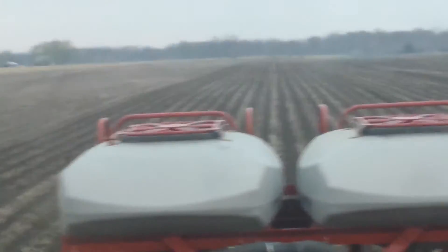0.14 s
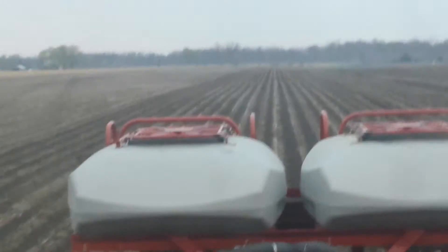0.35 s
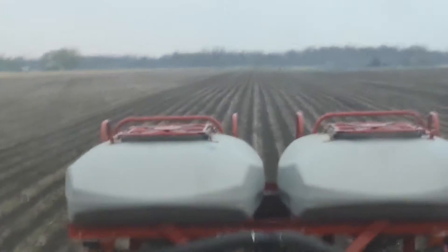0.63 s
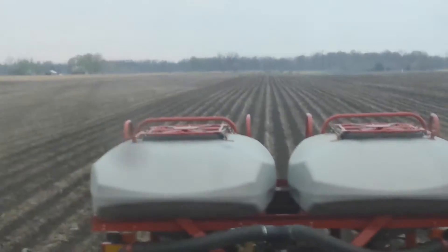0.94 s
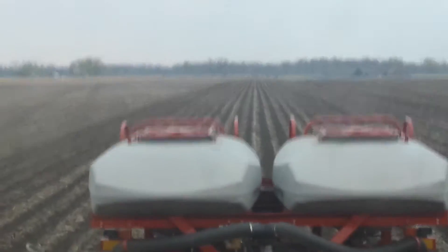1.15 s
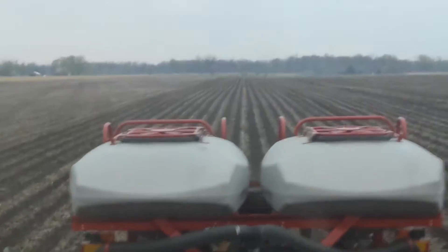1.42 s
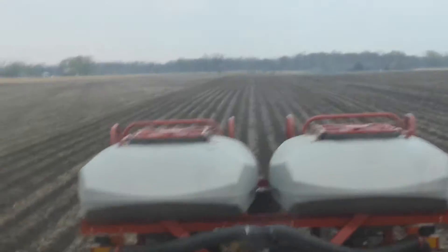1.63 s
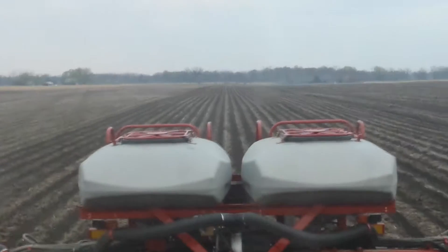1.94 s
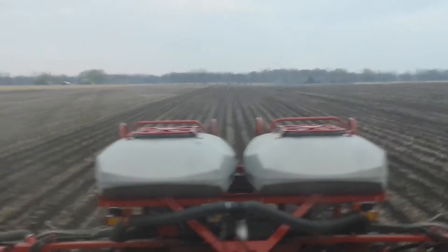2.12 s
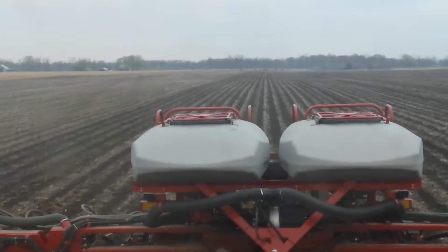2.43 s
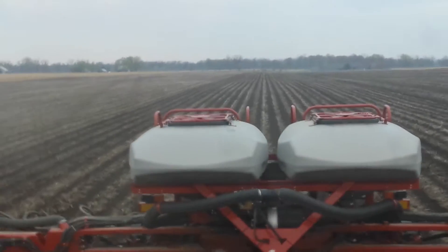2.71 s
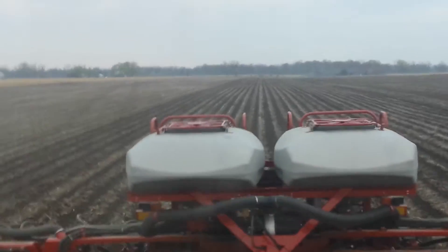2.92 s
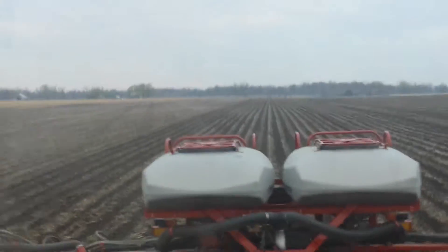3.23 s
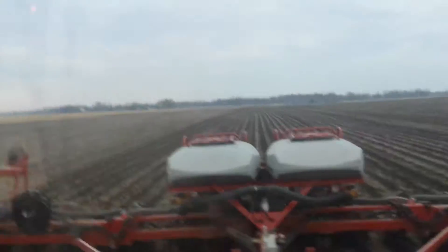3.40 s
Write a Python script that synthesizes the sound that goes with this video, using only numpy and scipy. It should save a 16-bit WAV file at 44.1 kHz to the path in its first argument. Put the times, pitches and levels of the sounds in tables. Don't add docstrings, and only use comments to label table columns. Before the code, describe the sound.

A tractor's hydraulic pump holds a steady, slightly wavering hum over a low diesel drone, with boomy cab resonance, blower rush, air hiss and faint rattles; close stereo microphone inside the closed cab.

```python
import sys
import numpy as np
from scipy import signal
from scipy.fft import rfft, irfft
from scipy.io import wavfile

SR = 44100
rng = np.random.default_rng(int(sys.argv[2]) if len(sys.argv) > 2 else 0)


def invert_db(level):
    return 10 ** (np.asarray(level, dtype=float) / 20)


def wrap_up_sound(samples):
    columns = np.atleast_2d(samples).T
    tamed = np.clip(columns, -1, 1)
    steps = np.round(tamed * 32767).astype(np.int16)
    wavfile.write(sys.argv[1], SR, steps)


N = 156996
PISTONS, GEAR_RATIO = 9, 1.1224


def rms_one(x):
    return x / np.sqrt(np.mean(x ** 2) + 1e-20)


def at_hz(points, hz):
    table_hz, values = np.transpose(points)
    return np.interp(np.log(hz), np.log(table_hz), values)


def noise_pair():
    return rng.standard_normal((2, N))


def drift(rate_hz):
    pole = np.exp(-80 * np.pi * rate_hz / SR)
    draws = rng.standard_normal(N // 40 + 2002)
    slow = signal.lfilter([1], [1, -2 * pole, pole * pole], draws)[2000:]
    return np.interp(np.arange(N) / 40, np.arange(len(slow)), rms_one(slow))


def resonance_db(hz, centre_hz, width_hz, lift_db):
    return lift_db / (1 + (2 * (hz - centre_hz) / width_hz) ** 2)


def shaft_tones(places, strengths, turns, swing_db):
    jitter_rad, overtones_follow = .012, .2
    out = np.zeros((2, N))
    ears = np.array([[.5], [-.5]])
    shaft_hz = np.gradient(turns) * SR
    for k, ((multiple, pan_db, lead_rad), (tone_db, waver_db)) in enumerate(zip(places, strengths)):
        phase = 2 * np.pi * (multiple * turns + rng.random())
        phase = phase + jitter_rad * multiple * drift(4.7)
        follow = overtones_follow if k else 1
        singing_db = resonance_db(multiple * shaft_hz, 1398, 7, 14)
        tone_db = tone_db + swing_db * follow + singing_db + waver_db * drift(3.7)
        out += np.sqrt(2) * invert_db(tone_db + ears * pan_db) * np.sin(phase + ears * lead_rad)
    return out


def pump_shaft():
    # t/s, rate f/Hz
    stroke_rate = [(0, 278.3), (.3, 277.7), (.75, 278), (1.1, 278.35), (1.45, 278.3), (1.7, 277.8),
                   (2.3, 277.75), (2.47, 279.5), (2.65, 278.1), (3.15, 278.1), (3.3, 279.5), (3.45, 278.4),
                   (3.56, 278.3)]
    strokes_hz = np.interp(np.arange(N) / SR, *np.transpose(stroke_rate))
    return np.cumsum(strokes_hz) / SR / PISTONS


def hydraulic_pump(pump_turns):
    # t/s, pressure pulse level/dB
    load = [(0.0, -15.5), (1.22, -15.5), (1.29, -20), (1.53, -12.5), (1.62, -15), (1.8, -13), (2.09, -16.5),
            (2.18, -10.5), (2.4, -16), (3.01, -15), (3.13, -16.5), (3.38, -13.5), (3.53, -23.5),
            (3.56, -24)]
    # multiple of shaft speed, left-right/dB, left leads/rad
    arrivals = [(9, .4, .14), (10, 2.8, -.1), (12, -1.2, -.32), (16.5, -5.7, .5), (18, -.5, 1.4),
                (27, -3.9, -.3), (36, 0, -.36), (45, -.7, 1.2), (50, -3.6, 1.4), (54, 0, 0), (63, 12, -2.2),
                (72.3, 6, 0), (81, 10, 0), (82, 12, -1.1), (86, 6, 0), (90.05, 3, 0)]
    # level re pulse/dB, waver/dB
    strengths = [(0.5, 1), (-11.5, 0.8), (-6, -0.25), (-19.5, -1), (-13.5, 3), (-11, 1.2), (-22.5, 3.5),
                 (-36, 2), (-32, 1), (-38.5, 3.5), (-28, 3), (-35.5, 0.5), (-35.5, 3), (-30.5, 1.5),
                 (-39, 3), (-40, 2)]
    pulse_db = np.interp(np.arange(N) / SR, *np.transpose(load))
    mean_db = pulse_db.mean()
    swing_db = .75 * (pulse_db - mean_db)
    return invert_db(mean_db) * shaft_tones(arrivals, strengths, pump_turns, swing_db)


def diesel(crank_turns):
    # multiple of crank speed, left-right/dB, left leads/rad
    arrivals = [(3, .2, .12), (4, .9, .1), (6, -1.2, -2), (7, .1, -.1), (14.955, -12, .65),
                (18, -2.8, -.56), (24, -11, .7), (28.94, 6.8, -.15), (45.98, 0, 0), (50.05, -.5, .36),
                (52.5, 0, 0), (86.85, 1.7, -.9)]
    # level/dB, waver/dB
    strengths = [(-27.5, -0.4), (-30, 1.5), (-27, 1.2), (-29.5, -0.5), (-31, -0.3), (-44, 6), (-45, 3.5),
                 (-42, 4), (-46.5, 1.5), (-45, 1), (-55.5, 6), (-49, 6)]
    return shaft_tones(arrivals, strengths, crank_turns, 0)


def cab_noise(spectrum):
    # f/Hz, width/Hz, lift/dB
    panels = [(151.4, 16, -5), (178, 47, 3.5), (289, 13, -9.5), (386, 29, -6), (528, 15, -5), (581, 37, 5),
              (650, 29, -4.5), (926, 58, 4.5), (974, 25, -4), (1395, 28, 6), (1582, 26, 5.5),
              (1960, 50, 3.5), (2220, 41, 4.5), (2400, 60, -2)]
    # f/Hz, side minus mid/dB
    side_width = [(125, -23), (155, -7), (200, -14), (340, -14), (430, -3), (600, -8), (1900, 6),
                  (2400, 0.5)]
    # f/Hz, left-right/dB
    side_lean = [(300, 0.3), (450, 1.5), (1000, 1), (1700, 1.5), (2400, 11), (3300, 1.5), (6300, 6),
                 (8000, -0.5)]
    hz = np.maximum(np.arange(N // 2 + 1) * SR / N, 1)
    db = at_hz(spectrum, hz)
    for centre_hz, width_hz, lift_db in panels:
        db = db + resonance_db(hz, centre_hz, width_hz, lift_db)
    inside = (hz >= spectrum[0][0]) & (hz < spectrum[-1][0])
    mid, side = rfft(noise_pair()) * invert_db(db) * inside
    wide = invert_db(at_hz(side_width, hz))
    pair = (mid + wide * side * [[1], [-1]]) / np.sqrt(1 + wide ** 2)
    lean_db = at_hz(side_lean, hz) / 2
    return rms_one(irfft(pair * invert_db([lean_db, -lean_db]), N))


def cab_boom():
    # f/Hz, level per Hz/dB
    boom_spectrum = [(12, -65.5), (20, -42), (80, -8.5), (225, -7), (279, -4), (463, -12), (733, -17),
                     (835, -17), (1000, -23.5), (1300, -63.5), (2200, -120)]
    boom = invert_db(-16.5 + 0.96 * drift(5.6)) * cab_noise(boom_spectrum)
    mic_low_cut = signal.butter(6, 74.6, "high", fs=SR, output="sos")
    return signal.sosfilt(mic_low_cut, boom)


def ground_rumble():
    ground_spectrum = [(15, -6), (28, 5), (42, 2), (70, -16)]  # f/Hz, level per Hz/dB
    return invert_db(-45.5) * cab_noise(ground_spectrum)


def gear_and_blower_rush(bumps_db):
    # f/Hz, level per Hz/dB
    rush_spectrum = [(560, -40), (950, -4), (1030, -3), (1100, -2.5), (1400, -4.5), (1700, -6), (1910, -3),
                     (2460, -8), (3000, -22), (3900, -54), (6600, -120)]
    return invert_db(-26.5 + .1 * bumps_db + 1.0 * drift(8.8)) * cab_noise(rush_spectrum)


def air_hiss(bumps_db, crank_turns):
    # f/Hz, level per Hz/dB
    hiss_spectrum = [(1650, -40), (2800, -3), (3560, -4.5), (4580, -8), (6470, -1.5), (9330, -10.5),
                     (10300, -18), (11600, -17), (12600, -24), (16400, -59.5), (22000, -120)]
    beat = 1 + .02 * np.sin(2 * np.pi * crank_turns)
    return invert_db(-35.5 + 0.29 * bumps_db) * beat * cab_noise(hiss_spectrum)


def rattle(bumps_db):
    ticks_per_s, ring_cycles, parts = 900, 12, 16
    out = np.zeros((2, N))
    sizes = invert_db(3.7 * np.minimum(rng.exponential(1, N), 4)) * rng.choice([-1, 1], N)
    born = rng.random(N) < ticks_per_s * invert_db(3.0 * bumps_db) / SR
    part = rng.integers(0, parts, N)
    for k, hz in enumerate(np.geomspace(3000, 8500, parts)):
        decay = 10 ** (-3 * hz / (ring_cycles * SR))
        step_rad = 2 * np.pi * hz / SR
        ring = [1, -2 * decay * np.cos(step_rad), decay * decay]
        ticks = sizes * born * (part == k) + 1e-18
        out[k % 2] += signal.lfilter([0, np.sin(step_rad)], ring, ticks)
    return invert_db(-47) * rms_one(out)


def electrical_buzz():
    # f/Hz, level/dB
    tick_spectrum = [(3000, -9), (4600, -6), (6300, -1), (9000, -5), (10200, -10), (11500, -12),
                     (12700, -12)]
    tick_hz, line_spread_db, ear_spread_db, ear_lag_s = 49.822, 5, 1, 0.000407
    hz = tick_hz * np.arange(60, 255)
    spread = rng.standard_normal((3, len(hz)))
    phase = 2 * np.pi * rng.random(len(hz))
    db = at_hz(tick_spectrum, hz) + line_spread_db * spread[2] + ear_spread_db * spread[:2]
    phase = phase + 2 * np.pi * hz * [[0], [ear_lag_s]]
    lines = np.zeros((2, N // 2 + 1), complex)
    lines[:, np.round(hz * N / SR).astype(int)] = invert_db(db) * np.exp(1j * phase)
    return invert_db(-51) * rms_one(irfft(lines, N))


def scene():
    pump_turns = pump_shaft()
    crank_turns = pump_turns / GEAR_RATIO
    bumps_db = 1.6 * drift(9.0)
    tones = hydraulic_pump(pump_turns) + diesel(crank_turns)
    low = cab_boom() + ground_rumble()
    air = gear_and_blower_rush(bumps_db) + air_hiss(bumps_db, crank_turns)
    return tones + low + air + rattle(bumps_db) + electrical_buzz()


def low_pass(x):
    return signal.sosfilt(signal.butter(12, 12780, fs=SR, output="sos"), x)


def record(dry):
    mix = 1.34 * np.tanh(dry / 1.279)
    return low_pass(mix)


dry = scene()
out = record(dry)
wrap_up_sound(out)
```